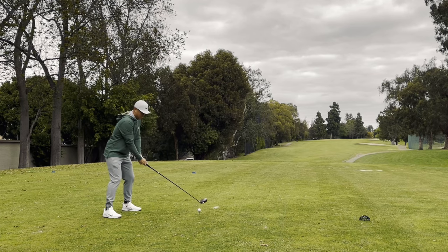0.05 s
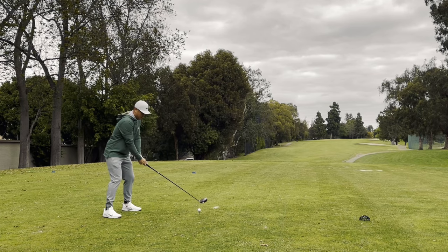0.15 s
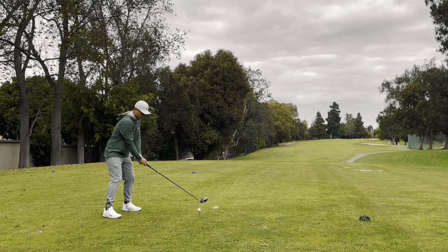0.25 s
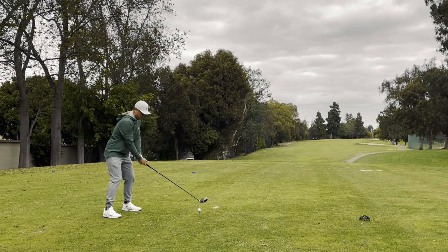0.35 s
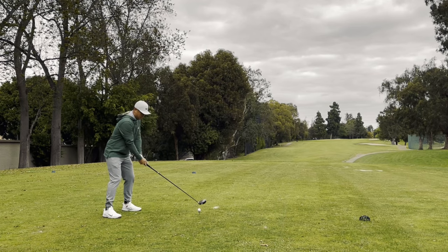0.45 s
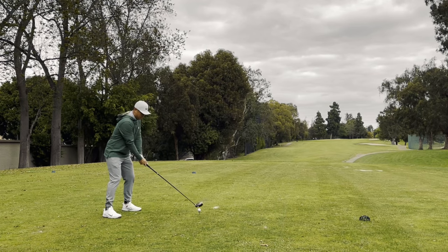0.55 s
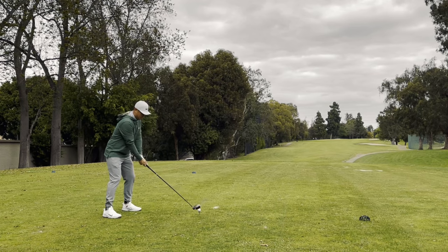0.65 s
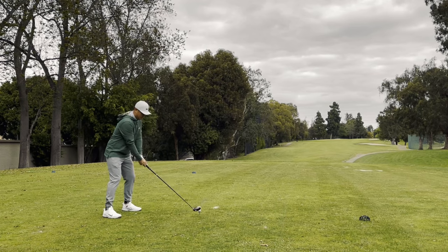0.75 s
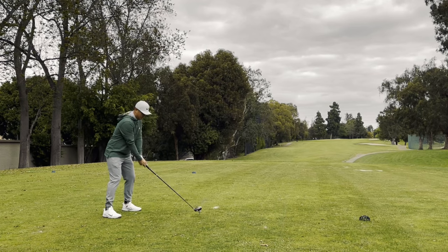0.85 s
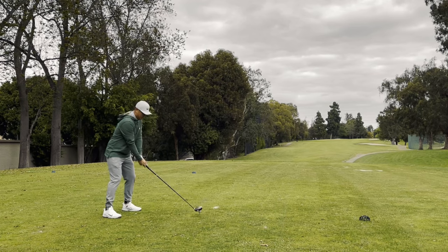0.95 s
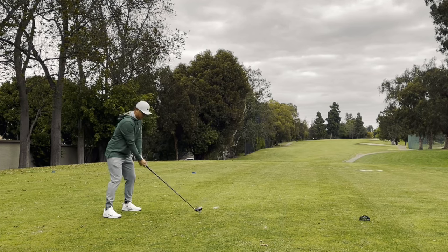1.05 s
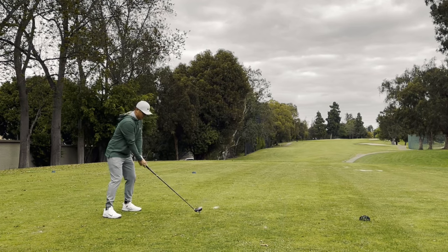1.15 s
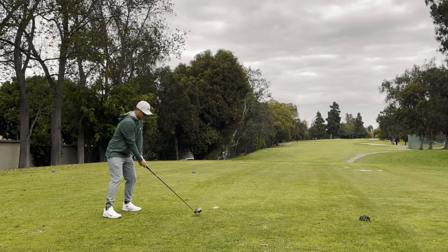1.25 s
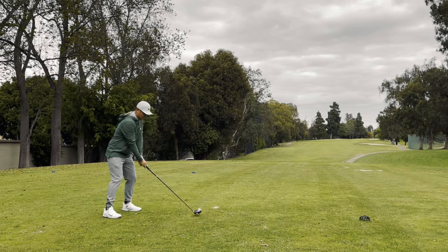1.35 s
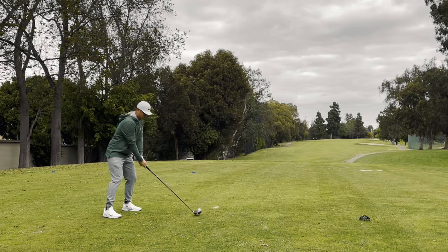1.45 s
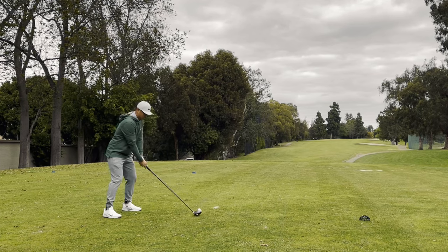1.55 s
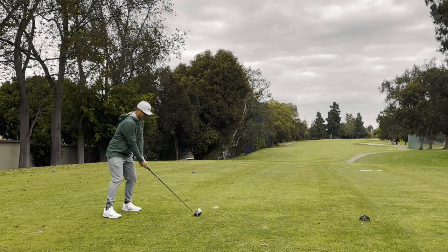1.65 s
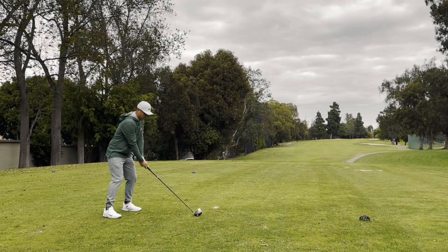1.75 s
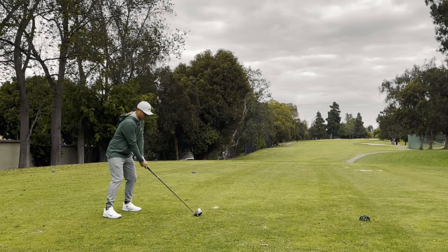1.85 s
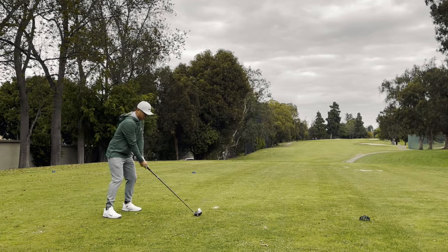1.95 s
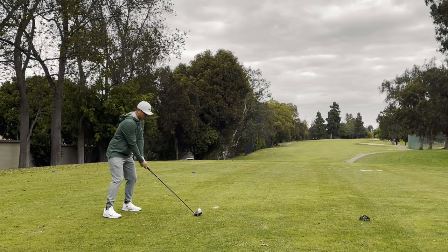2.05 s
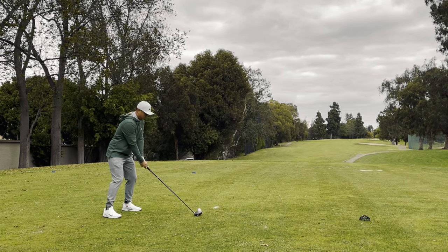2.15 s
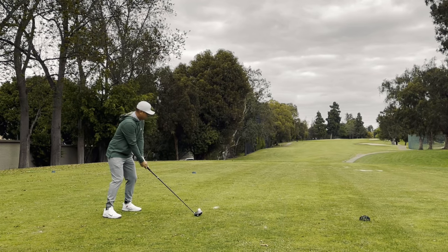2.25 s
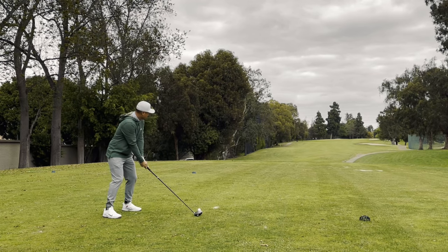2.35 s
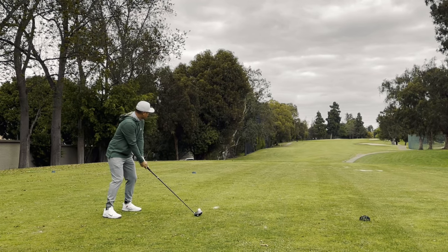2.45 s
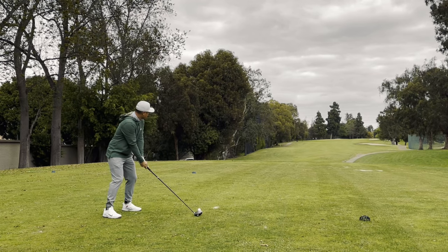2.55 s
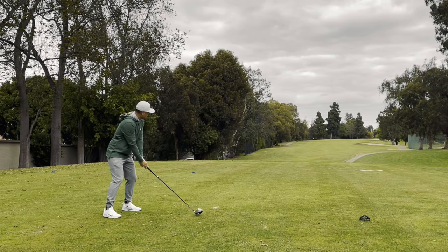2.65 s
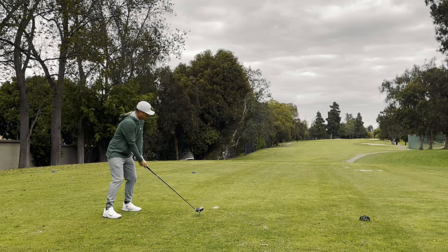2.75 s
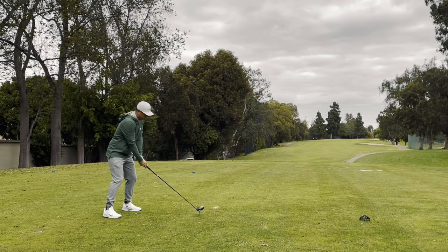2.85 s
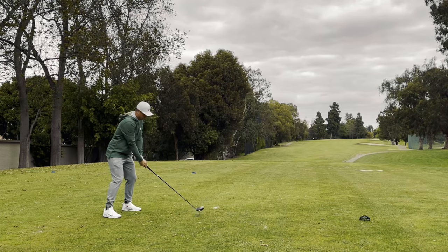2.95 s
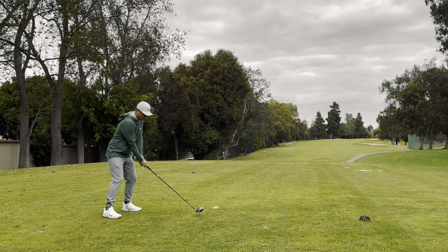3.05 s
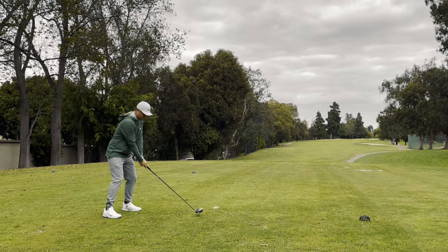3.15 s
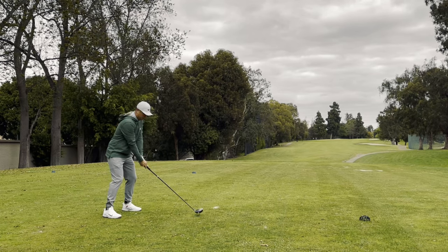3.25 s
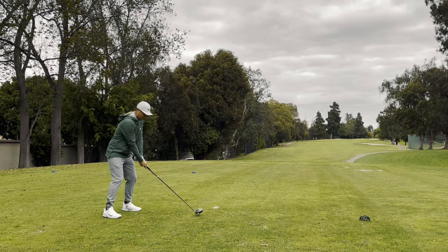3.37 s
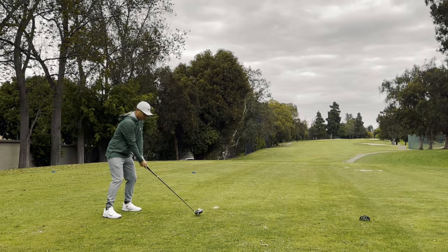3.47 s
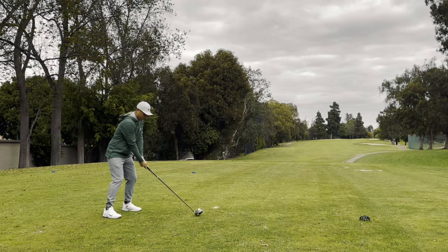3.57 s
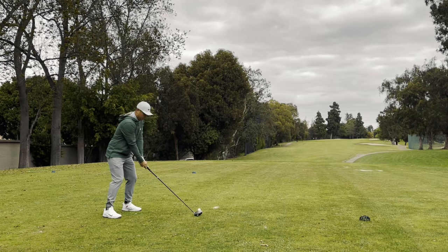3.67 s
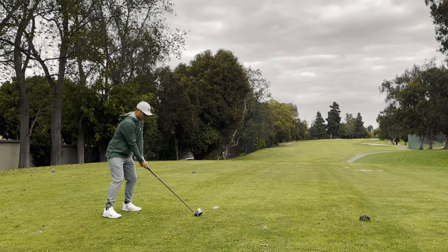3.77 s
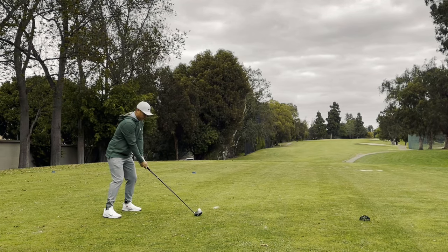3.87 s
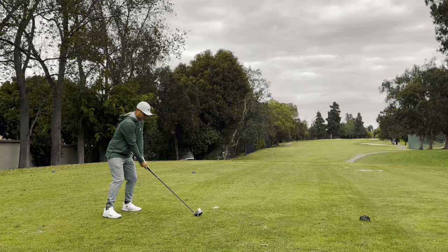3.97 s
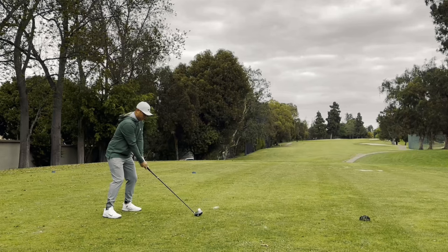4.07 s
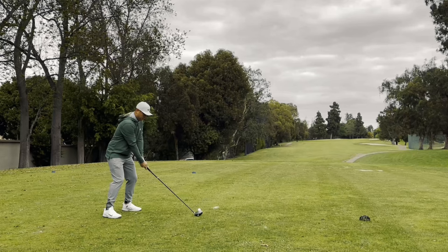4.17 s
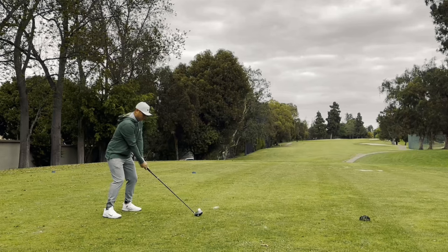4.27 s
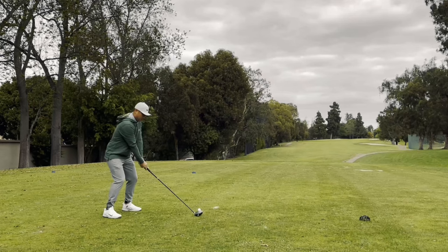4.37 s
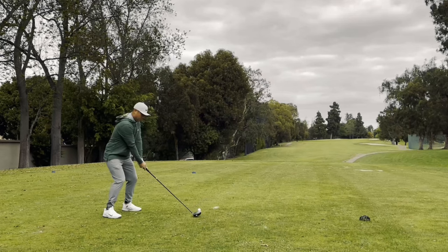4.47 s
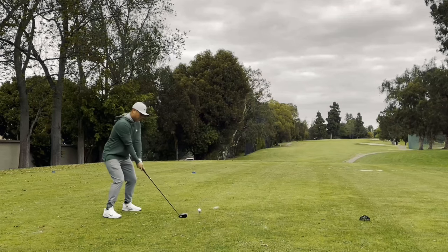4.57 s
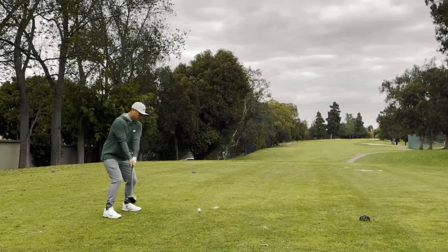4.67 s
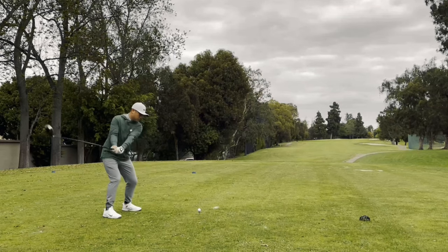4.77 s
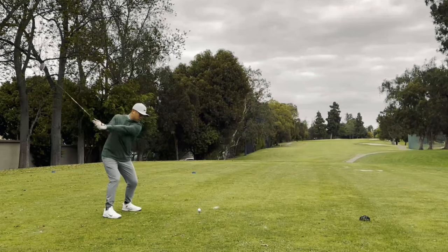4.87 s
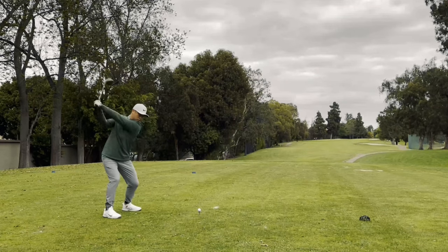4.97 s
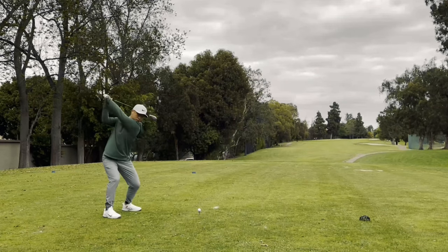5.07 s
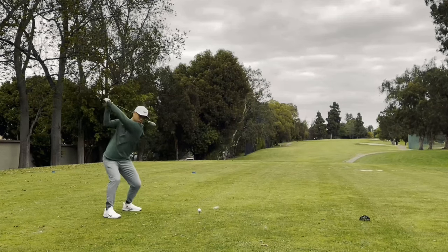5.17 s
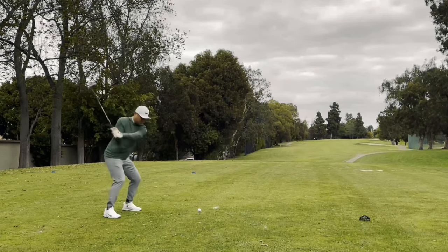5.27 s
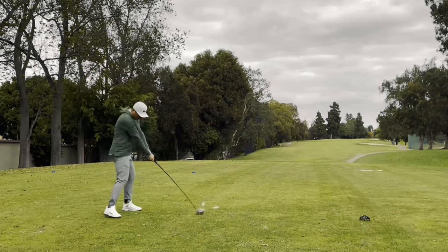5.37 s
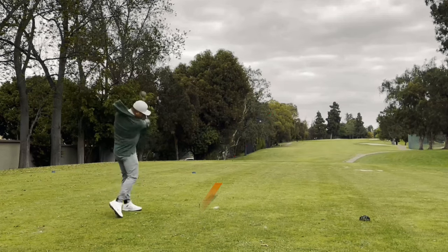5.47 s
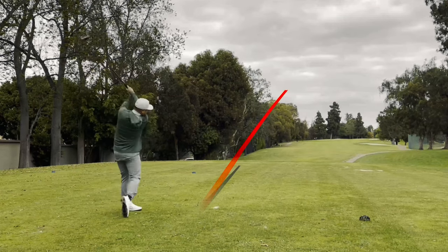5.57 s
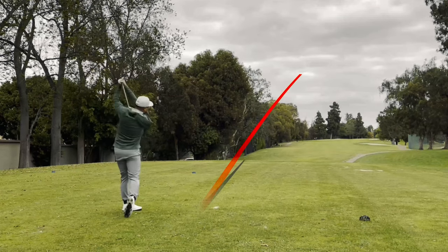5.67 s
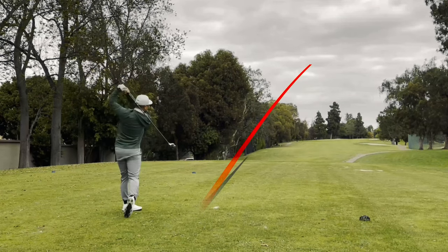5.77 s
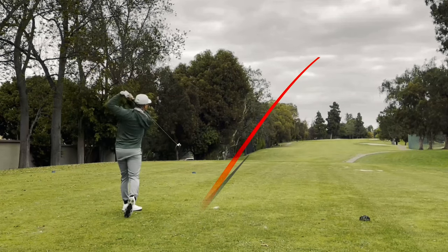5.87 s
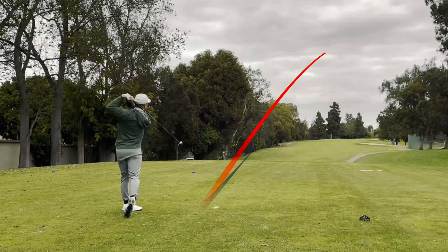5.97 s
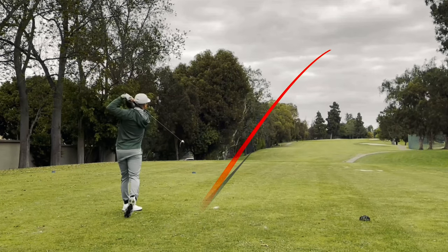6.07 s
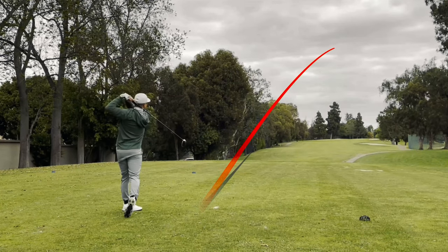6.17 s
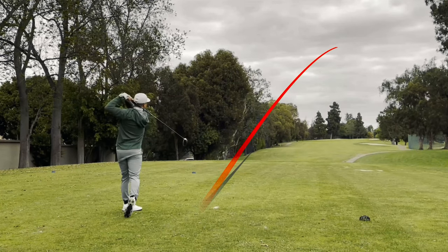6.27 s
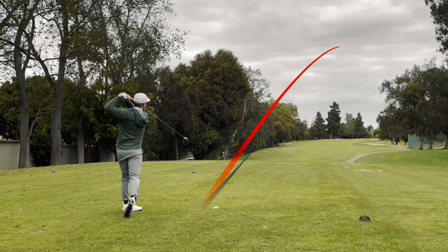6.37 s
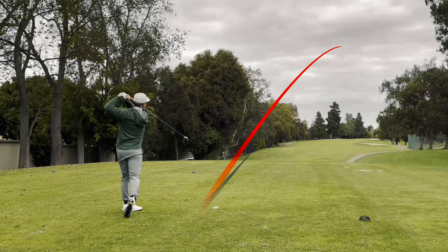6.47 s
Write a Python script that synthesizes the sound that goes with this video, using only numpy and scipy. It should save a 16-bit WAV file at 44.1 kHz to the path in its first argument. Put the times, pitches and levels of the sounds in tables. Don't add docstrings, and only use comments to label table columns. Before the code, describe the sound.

Outdoors on a tree-lined golf tee, a steady low road rumble and distant mower drone underlie soft leaf rustle, thin birdsong and tiny twig snaps. Around 5.4 seconds a fast swish ends in a very sharp, bright, hollow metallic crack as the club hits the ball. Trees return a brief hiss; the background dips, then recovers with small ticks and chirps. Stereo microphone a few metres away.

```python
import sys
import numpy as np
from scipy import signal
from scipy.fft import rfft, irfft
from scipy.io import wavfile

SR = 44100
rng = np.random.default_rng(int(sys.argv[2]) if len(sys.argv) > 2 else 0)


def volts(x):
    e = np.asarray(x, float) / 20
    return 10 ** e


def materialize(psi):
    bounded = np.clip(np.atleast_2d(psi).T, -1, 1)
    quanta = np.round(bounded * 32767).astype(np.int16)
    wavfile.write(sys.argv[1], SR, quanta)


N = 287487

# time in seconds, firing rate in Hz,
# first order in dB, second order in dB.
MOWER_DRONE = [(0, 66.47, -37.5, -48.5), (.9, 66.6, -39, -42.5), (1.5, 66.4, -39, -46.5),
               (2.1, 66.6, -35.5, -46.5), (2.9, 66.6, -36, -45.5), (3.2, 67.1, -39.5, -50),
               (3.45, 67.34, -34.5, -43), (3.75, 66.9, -40.5, -45.5), (3.9, 66.67, -31, -45.5),
               (4.1, 66.45, -40, -43.5), (5.0, 66.42, -39, -42.5), (5.35, 66.48, -39.5, -39),
               (5.7, 67.4, -41, -39), (6.1, 67.72, -38, -45.5), (6.52, 67.6, -39, -45)]
MOWER_THIRD_DB = -59.5
# time in seconds, pitch in Hz, level in dB.
VEHICLE_HUM = [(0, 55.45, -46), (.5, 58.2, -33.5), (.9, 60.6, -35), (1.3, 61, -52), (1.9, 61.2, -64)]

# frequency in Hz, level in dB per Hz.
AIR_COLOUR = [(25, -28), (50, 2), (130, -4.5), (220, -14), (400, -21.5), (800, -15.5), (1300, -18),
              (2300, -27), (3200, -34.5), (5000, -42), (6400, -45.5), (8000, -53.5), (11000, -63),
              (13000, -74.5)]
AIR_DB = -41
RUMBLE_DB, RUMBLE_SWELL_DB = 2.5, -0.17
HISS_DB, HISS_GAINS_DB_PER_S = -1.55, 0.4828
# peak time in seconds, rise in dB, half length in seconds.
LEAF_GUSTS = [
    (.95, 4.5, 0.58),
    (2.5, 2, 0.63),
    (5.205, 4, .3),
    (6.45, 7, 0.47),
]

# frequency in Hz, likeness from 0 to 1.
PORT_LIKENESS = [(60, 0.97), (150, 0.67), (300, 0.71), (700, 0.26), (1500, 0.35), (2600, 0.54),
                 (3800, 0.067), (4500, 0.68), (6900, 0.24), (8400, .65), (9400, 0.5), (9900, 0.8),
                 (10700, 0.31), (11500, 0.21)]
# frequency in Hz, left minus right in dB.
PORT_BALANCE = [(60, -.5), (200, 1.5), (630, 3), (1140, 3), (2060, 2.5), (6700, 3), (8500, 1), (9800, 0),
                (12100, 0)]
# frequency in Hz, lead in radians.
FAR_LEAD = [(0, 0), (200, 0), (690, 2.2), (2500, 7.1), (3200, 7.8), (4050, 6.8), (5340, 7.3), (6370, 6.6),
            (7400, 7.5), (8440, 6.4), (9400, 4.5), (9900, 3.2), (10650, 3.1), (11600, .1)]
# frequency in Hz, lead in radians.
TEE_LEAD = [(0, 0), (700, .6), (1700, .5), (3100, 1.7), (4300, .3), (5500, 1.4), (6400, .7), (7400, 1.1),
            (8440, .1), (9400, -1.8), (9900, -3.0), (10600, -3.3), (11600, -5.8), (12500, -6.9)]

# start in seconds, peak in dB.
BIRD_CHIPS = [(3.81, -55.5), (3.92, -58), (3.97, -60), (4.04, -58), (4.91, -59), (4.985, -51), (5.09, -56),
              (5.13, -59), (5.23, -59), (6.487, -53)]
CHIP_HZ, CHIP_T60_S, CHIP_NOISE_SHARE = 6460, .022, .08
# start in seconds, peak in dB, pitch in Hz.
TWIG_SNAPS = [(.2525, -52.5, 7000), (.269, -55, 8300), (.327, -50, 7000), (.376, -56, 6800),
              (.852, -44, 6527), (.885, -52, 6510), (2.478, -66, 7000), (2.588, -60, 8500),
              (5.938, -62, 7500), (5.97, -48.5, 4890), (6.142, -60, 8000), (6.282, -47, 5510),
              (6.313, -42, 6900), (6.335, -52, 6400), (6.395, -53, 5000)]
SNAP_T60_S, SNAP_NOISE_SHARE = .009, 0.7
# start in seconds, peak in dB, pitch in Hz,
# time to fall 60 dB in seconds.
RINGING_KNOCKS = [(.852, -45, 4685, .014), (.91, -64, 10840, .03), (2.918, -30.5, 294.4, .02),
                  (5.432, -35, 5600, .02), (5.5, -25, 8260, .012), (5.52, -19, 11000, 0.0087),
                  (5.52, -23.5, 14650, 0.0061), (6.224, -36.5, 6760, .01), (6.282, -44.5, 6380, 0.11),
                  (6.282, -43, 15230, .17), (6.282, -46, 10500, .02), (6.371, -33.5, 6400, 0.0099)]
KNOCK_NOISE_SHARE, KNOCK_NOISE_HZ = 0.098, 7000

# start in seconds, length in seconds, first pitch in Hz,
# last pitch in Hz, level in dB.
ROUGH_SONG = [(.858, .032, 4400, 5500, -64), (.884, .016, 5600, 5200, -58), (.905, .055, 5450, 5200, -70),
              (.975, .028, 4950, 4650, -67), (1.003, .02, 4400, 4620, -61), (1.033, .026, 4480, 4420, -61),
              (1.062, .02, 4450, 4350, -63), (2.362, .032, 4400, 5300, -73), (2.388, .055, 5500, 4850, -66),
              (2.448, .022, 5200, 5650, -68), (2.468, .045, 5650, 4700, -66), (2.512, .11, 4950, 4470, -66),
              (2.695, .075, 4550, 4700, -74)]
# start in seconds, length in seconds, first pitch in Hz,
# last pitch in Hz, level in dB.
CLEAR_WHISTLES = [(2.1, .13, 2480, 2600, -72), (2.2, .2, 2800, 2870, -73), (2.26, .15, 2560, 2500, -72),
                  (2.42, .05, 2800, 2550, -70), (6.238, .048, 2280, 2560, -60),
                  (6.283, .02, 2260, 2200, -58), (6.318, .032, 2520, 2150, -56),
                  (6.343, .026, 2500, 2180, -57), (6.25, .04, 3250, 3480, -64),
                  (6.268, .038, 3050, 3220, -62), (6.328, .026, 3320, 2950, -63)]
RISE_POWER, FALL_POWER = 1.7, .5
NOTE_EDGE = .2
LEAF_ECHO_DB, LEAF_ECHO_DB_PER_S = -35, 80

# time in seconds, head hiss in dB, head speed in metres per second.
DOWNSWING = [(5.26, -81, 30), (5.31, -74, 35), (5.333, -54, 39.7), (5.347, -40.5, 43), (5.38, -36.5, 43),
             (5.405, -38.5, 47.6), (5.43, -41.5, 41), (5.5, -75.5, 39)]
# frequency in Hz, level in dB per Hz.
SWISH_COLOUR = [(240, -31), (400, 1), (526, -9), (590, 2.5), (702, -5), (978, -6.5), (1150, -13),
                (1770, -12), (2130, -17.5), (4440, -10.5), (7150, -15.5), (7910, -15), (12500, -19.5),
                (16300, -54.5), (22000, -120)]
SHAFT_M, STROUHAL = .01, .2
FULL_M_PER_S, WHISTLE_DB, WHISTLE_DB_PER_DECADE = 47.2, -34.5, 239
EDGE_S, EDGE_HZ, EDGE_FALL_HZ_PER_S = 5.362, 4700, 22000
EDGE_DB, EDGE_T60_S, EDGE_HALF_S = -7, .003, .016

BLOW_S = 5.4107
# pitch in Hz, level in dB, time to fall 60 dB in seconds.
FACE_MODES = [(1355, -36, 0.0098), (1960, -29, 0.0019), (2800, -22, 0.032), (3420, -36, 0.25),
              (3620, -48, .12), (4280, -30, .06), (4280, -39, 0.12), (8100, -28.5, .04), (7460, -36, 0.047),
              (4762, -24, 0.032), (7470, -27, 0.016), (8220, -22, 0.016), (9220, -23.5, 0.026),
              (9430, -18, 0.0066), (10400, -9.5, 0.0027), (11250, -6.5, .004), (11260, -20.5, 0.014),
              (12400, -11.5, 0.0026), (15230, -14.5, .008)]
# pitch in Hz, level in dB,
# time to fall 60 dB in seconds.
SHELL_MODES = [(5518, -14, .014), (5900, -7.5, 0.015), (6085, -25, 0.055), (6350, -22, 0.0151)]
# frequency in Hz, level in dB per Hz.
CRACK_COLOUR = [(500, 5.0), (3000, -5.5), (7000, -10.0), (9000, 1.0), (11800, -2), (13500, -11.0),
                (16000, -12.5)]
# delay in seconds, level in dB, build-up in seconds, decay in dB per second.
TREE_BANKS = [
    (.004, -29.5, 0.035, 93),
    (.085, -35.5, 0.026, 48),
]
# frequency in Hz, level in dB per Hz.
LEAF_COLOUR = [(880, -15), (1500, -12.5), (1960, -14), (8710, -5), (9780, -3), (10000, -29.5), (10600, -7),
               (11800, -14), (12500, -43.5), (16300, -73), (22000, -120)]

# frequency in Hz, gain in dB.
MIC_TOP = [(11800, -0.5), (12600, -12.5), (13200, -22), (16000, -15.5)]
KNEE_DB, SLOPE, ATTACK_S = -18, 1.286, 0.038
BASS_DB_PER_S, REST_DB_PER_S, SPLIT_HZ = 84.5, 110, 74


def rms_one(x):
    return x / np.sqrt(np.mean(x ** 2) + 1e-20)


def in_time(rows):
    s, *columns = np.transpose(rows)
    return [np.interp(np.arange(N) / SR, s, c) for c in columns]


def at_hz(points, hz):
    table_hz, value = np.transpose(points)
    return np.interp(np.log(hz + 1), np.log(table_hz + 1), value)


def drift(rate):
    r = np.exp(-80 * np.pi * rate / SR)
    slow = signal.lfilter([1], [1, -2 * r, r * r], rng.standard_normal(N // 40 + 2002))[2000:]
    return np.interp(np.arange(N) / 40, np.arange(len(slow)), rms_one(slow))


def ring(x, hz, t60):
    r, w = volts(-60 / (t60 * SR)), 2 * np.pi * hz / SR
    return signal.lfilter([0, np.sin(w)], [1, -2 * r * np.cos(w), r * r], x + 1e-18)


def click(s, width_s):
    t = np.arange(N) / SR - s
    return np.exp(-.5 * (t / width_s) ** 2) / (width_s * SR * np.sqrt(2 * np.pi))


def ports(spectrum, phase, lean=1):
    hz = np.arange(spectrum.shape[-1]) * SR / N
    lead = np.interp(hz, *np.transpose(phase))
    half = volts(lean * at_hz(PORT_BALANCE, hz) / 2) * np.exp(.5j * lead)
    return spectrum * np.array([half, 1 / half])


def field(colour, phase, scatter=1):
    white = rfft(rng.standard_normal((3, N)))
    hz = np.arange(white.shape[1]) * SR / N
    alike = np.clip(at_hz(PORT_LIKENESS, hz), 0, 1) ** scatter
    mixed = np.sqrt(alike) * white[0] + np.sqrt(1 - alike) * white[1:]
    both = ports(mixed, phase) * volts(at_hz(colour, hz))
    return both / np.sqrt(2 * np.mean(np.sum(np.abs(both) ** 2, axis=1))) * N


def octaves(spectra, gain):
    pitch = np.log2(np.clip(np.arange(spectra.shape[1]) * SR / N / 60, 1, 256))
    out = 0
    for k in range(9):
        band = np.clip(1 - np.abs(pitch - k), 0, 1)
        out = out + gain(60 * 2 ** k) * irfft(spectra * band, N)
    return out


def engines():
    hz, first_db, second_db = in_time(MOWER_DRONE)
    turn = 2 * np.pi * np.cumsum(hz) / SR
    mower = 0
    for k, db in [(1, first_db), (2, second_db), (3, MOWER_THIRD_DB)]:
        level = volts(db + 1.34 * drift(3.6))
        mower = mower + level * np.sin(k * turn + 1.02 * drift(1.35))
    hz, db = in_time(VEHICLE_HUM)
    vehicle = volts(db) * np.sin(2 * np.pi * np.cumsum(hz) / SR)
    return np.sqrt(2) * (mower + vehicle)


def air():
    t = np.arange(N) / SR
    rumble_db = RUMBLE_DB + RUMBLE_SWELL_DB * drift(.8)
    hiss_db = HISS_DB + HISS_GAINS_DB_PER_S * t
    rustle_db = sum(db * np.exp(-((t - s) / half_s) ** 2) for s, db, half_s in LEAF_GUSTS)

    def swell(hz):
        source_db = rumble_db if hz < 400 else hiss_db if hz < 5000 else rustle_db
        return volts(source_db + .5 * drift(9.4))

    return volts(AIR_DB) * octaves(field(AIR_COLOUR, FAR_LEAD), swell)


def ticks():
    rows = [(s, db, CHIP_HZ, CHIP_T60_S, CHIP_NOISE_SHARE) for s, db in BIRD_CHIPS]
    rows += [(s, db, hz, SNAP_T60_S, SNAP_NOISE_SHARE) for s, db, hz in TWIG_SNAPS]
    for s, db, hz, t60 in RINGING_KNOCKS:
        share = KNOCK_NOISE_SHARE * np.exp(-2 * np.log(hz / KNOCK_NOISE_HZ) ** 2)
        rows.append((s, db, hz, t60, share))
    out, t = np.zeros(N), np.arange(SR // 4) / SR
    bright = signal.butter(2, [4300, 10000], "band", fs=SR, output="sos")
    spit = signal.sosfilt(bright, rng.standard_normal((len(rows), len(t))))
    for (s, db, hz, t60, share), noise in zip(rows, spit):
        share, at = np.clip(share, 0, 1), round(s * SR)
        mode = (1 - share) * np.sin(2 * np.pi * hz * t) * volts(-60 * t / t60)
        hiss = 2 * share * noise * volts(-60 * t / 0.021)
        onset = 1 - np.exp(-t / 0.0002)
        out[at:at + len(t)] += (volts(db) * (mode + hiss) * onset)[:N - at]
    return irfft(ports(rfft(out), TEE_LEAD, lean=.6), N)


def notes(rows, burr_db, wobble):
    out, burr, waver = np.zeros(N), volts(burr_db * drift(60)), 1 + wobble * drift(90)
    for s, length_s, from_hz, to_hz, db in rows:
        at, part = round(s * SR), np.linspace(0, 1, round(length_s * SR))
        here = slice(at, at + len(part))
        glide = part ** (RISE_POWER if to_hz > from_hz else FALL_POWER)
        hz = (from_hz + (to_hz - from_hz) * glide) * waver[here]
        edges = np.clip(np.minimum(part, 1 - part) / NOTE_EDGE, 0, 1)
        out[here] += np.sqrt(2) * volts(db) * edges * np.sin(2 * np.pi * np.cumsum(hz) / SR)
    return out * burr


def birds():
    song = notes(ROUGH_SONG, burr_db=2.5, wobble=.013)
    song = song + notes(CLEAR_WHISTLES, burr_db=1.2, wobble=.004)
    t = np.arange(SR // 2) / SR
    wash = volts(LEAF_ECHO_DB - LEAF_ECHO_DB_PER_S * t) * rng.standard_normal((2, len(t)))
    echoes = signal.fftconvolve(song[None], wash, axes=1)[:, :N]
    return irfft(ports(rfft(song), FAR_LEAD), N) + echoes


def swing():
    t = np.arange(N) / SR
    hiss_db, speed = in_time(DOWNSWING)
    hiss = volts(hiss_db) * irfft(field(SWISH_COLOUR, TEE_LEAD, scatter=.4), N)

    whistle_hz = STROUHAL * speed / SHAFT_M
    whistle_db = WHISTLE_DB + WHISTLE_DB_PER_DECADE * np.log10(speed / FULL_M_PER_S)
    ragged = rms_one(ring(rng.standard_normal(N), 60, 0.012))
    whistle = volts(whistle_db) * ragged * np.sin(2 * np.pi * np.cumsum(whistle_hz) / SR)

    edge_hz = np.clip(EDGE_HZ - EDGE_FALL_HZ_PER_S * (t - EDGE_S), 2000, 8000)
    edge_level = volts(hiss_db + EDGE_DB) * np.exp(-.5 * ((t - EDGE_S) / EDGE_HALF_S) ** 2)
    rough = rms_one(ring(rng.standard_normal(N), 99, EDGE_T60_S))
    edge = edge_level * rough * np.sin(2 * np.pi * np.cumsum(edge_hz) / SR)

    passing = (t > DOWNSWING[0][0]) & (t < DOWNSWING[-1][0] + .05)
    return passing * (hiss + edge + whistle)


def blow():
    t = np.arange(N) / SR
    face = sum(volts(db) * ring(click(BLOW_S, 1.5e-5), hz, t60) for hz, db, t60 in FACE_MODES)

    release = click(BLOW_S + 0.0023, 0.0005)
    shell = 0
    for hz, db, t60 in SHELL_MODES:
        push = 2 * release * np.sin(2 * np.pi * hz * t)
        shell = shell + volts(db) * ring(push, hz, t60)

    ms = np.clip(t - BLOW_S - .0001, 0, .2) * 1000
    turn = 7.85 * np.log(1 + .89 * ms) + 2.37
    thump = ms * (volts(-8.5 - 4.15 * ms) + volts(-32 - .9 * ms)) * np.cos(turn)

    crack_level = (ms > 0) * (volts(-13.0 - 12.0 * ms) + volts(-17 - 1.7 * ms))
    crack = crack_level * irfft(field(CRACK_COLOUR, TEE_LEAD, scatter=0.52), N)

    arrived = np.clip((t - BLOW_S) / .0004 + 1, 0, 1)
    return arrived * irfft(ports(rfft(face + shell + thump), TEE_LEAD, lean=0.56), N) + crack


def trees():
    late = np.clip(np.arange(N) / SR - BLOW_S, 0, None)
    banks = 0
    for s, db, rise_s, decay in TREE_BANKS:
        build_up = np.clip((late - s) / rise_s, 0, 1)
        banks = banks + volts(db - decay * (late - s)) * build_up

    def air_loss(hz):
        return volts(-.5 * late * (hz / 1000) ** 2 + 1.3 * drift(40))

    return banks * octaves(field([(500, -23)] + LEAF_COLOUR, TEE_LEAD, scatter=0.65), air_loss)


def scene():
    return engines() + air() + ticks() + birds() + swing() + blow() + trees()


def band_limit(x):
    return signal.sosfilt(signal.butter(12, 15600, fs=SR, output="sos"), x)


def record(dry):
    mic_gain = volts(at_hz(MIC_TOP, np.arange(N // 2 + 1) * SR / N))
    cepstrum = irfft(np.log(mic_gain), N)
    cepstrum[1:N // 2 + 1] *= 2
    dry = irfft(rfft(dry) * np.exp(rfft(cepstrum[:N // 2 + 1], N)), N)

    peak_db = 20 * np.log10(np.abs(dry).max(axis=0) + 1e-9)
    over_db = SLOPE * np.clip(peak_db - KNEE_DB, 0, None)
    t, r = np.arange(N) / SR, np.exp(-1 / (ATTACK_S * SR))
    bass = signal.sosfiltfilt(signal.butter(2, SPLIT_HZ, fs=SR, output="sos"), dry)
    mix = 0
    for part, db_per_s in ((bass, BASS_DB_PER_S), (dry - bass, REST_DB_PER_S)):
        held_db = np.maximum.accumulate(over_db + db_per_s * t) - db_per_s * t
        mix = mix + part * volts(-signal.lfilter([1 - r], [1, -r], held_db))
    return band_limit(mix)


dry = scene()
out = record(dry)
materialize(out)
```